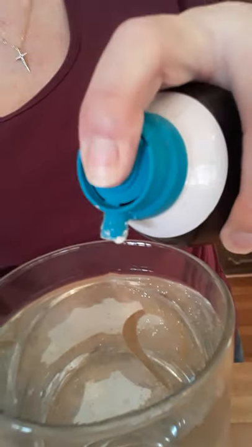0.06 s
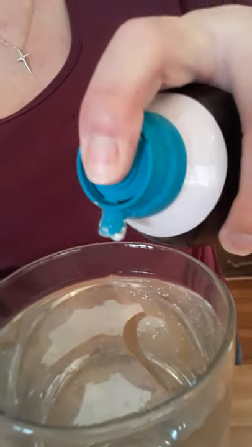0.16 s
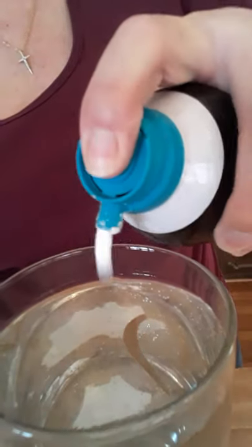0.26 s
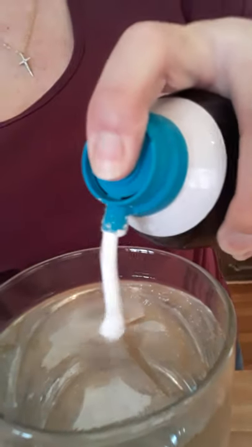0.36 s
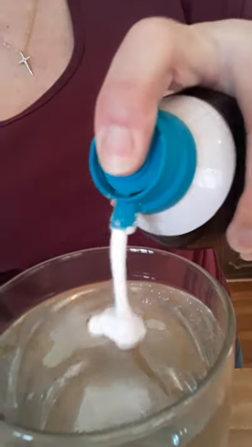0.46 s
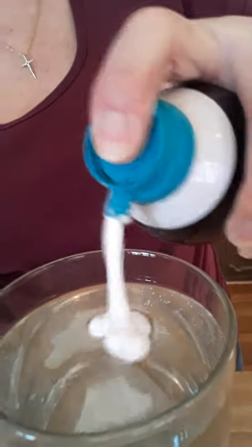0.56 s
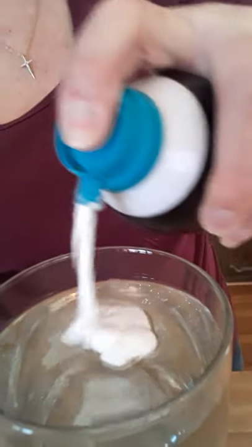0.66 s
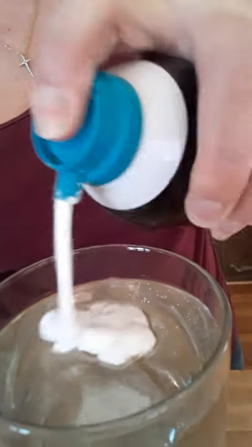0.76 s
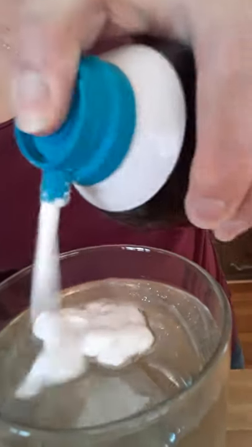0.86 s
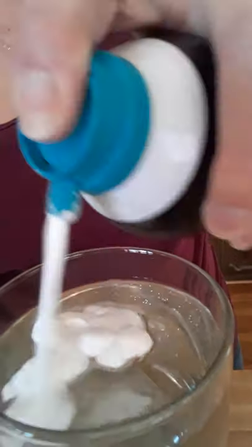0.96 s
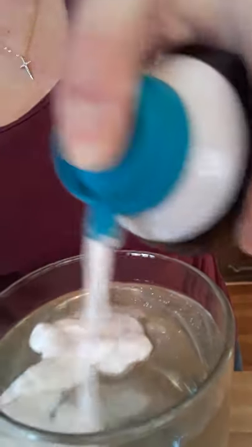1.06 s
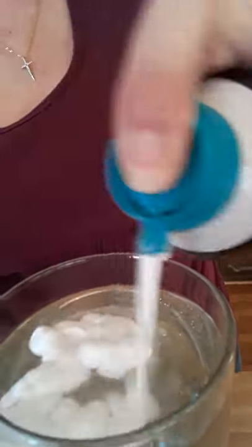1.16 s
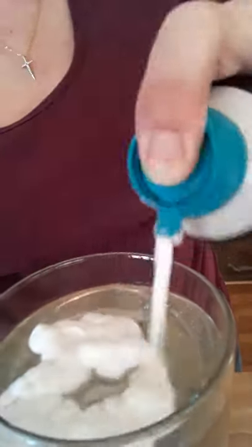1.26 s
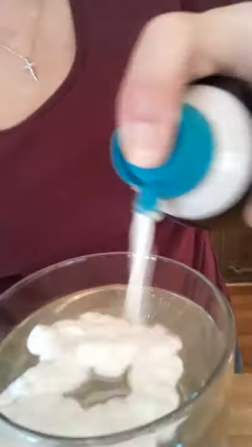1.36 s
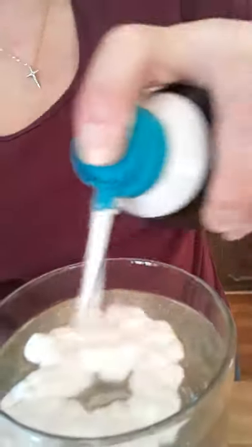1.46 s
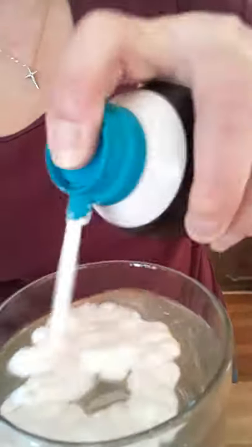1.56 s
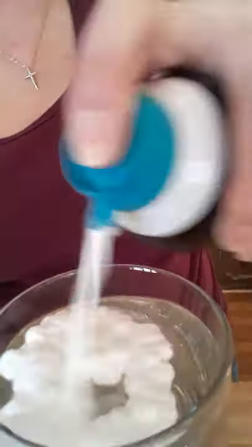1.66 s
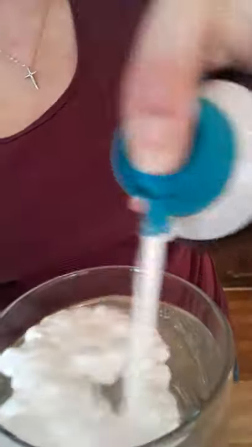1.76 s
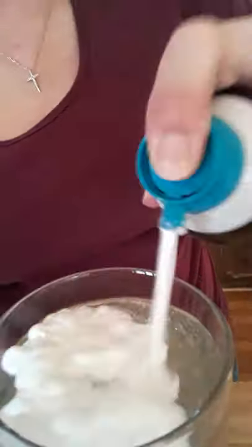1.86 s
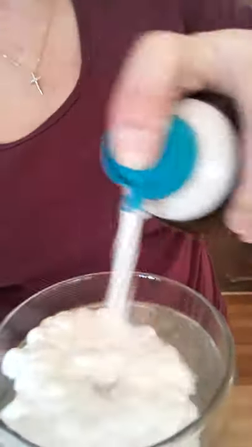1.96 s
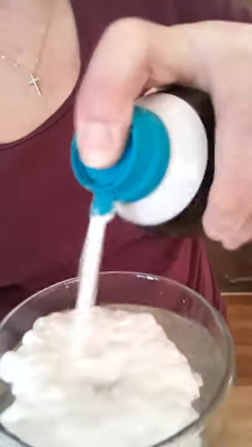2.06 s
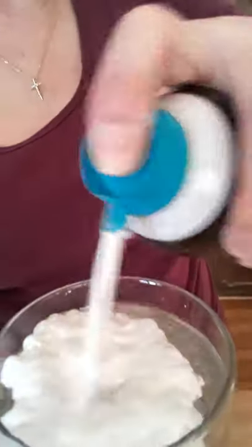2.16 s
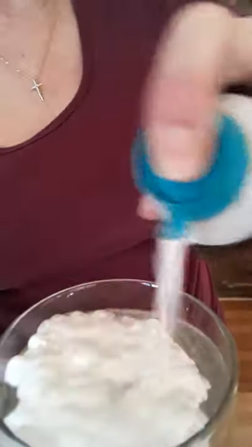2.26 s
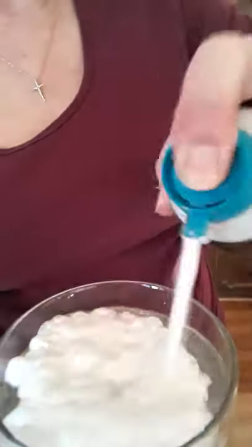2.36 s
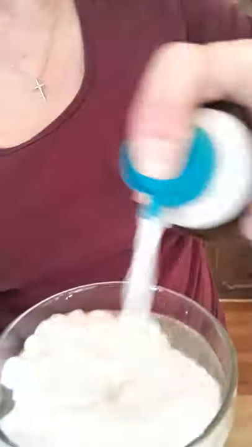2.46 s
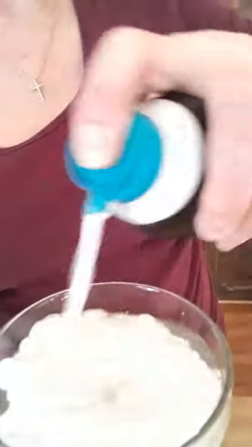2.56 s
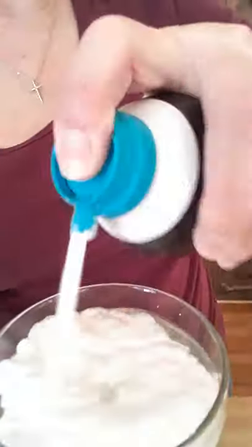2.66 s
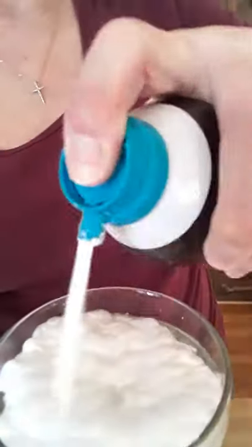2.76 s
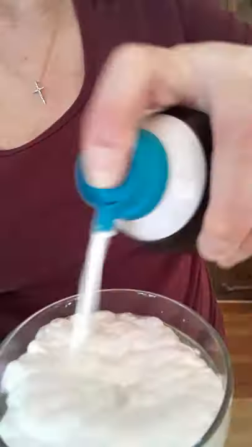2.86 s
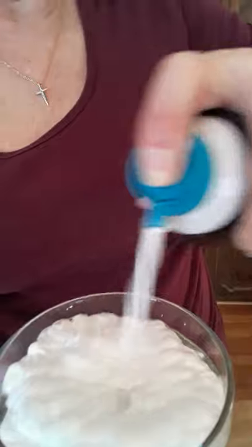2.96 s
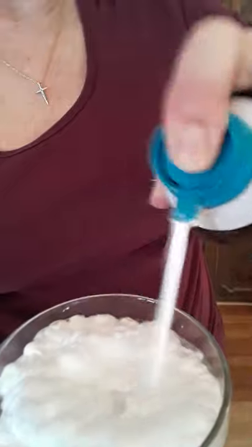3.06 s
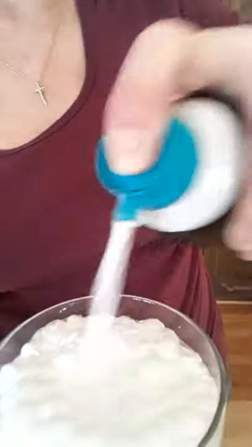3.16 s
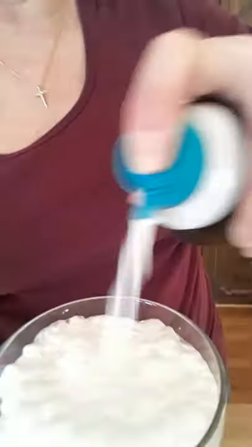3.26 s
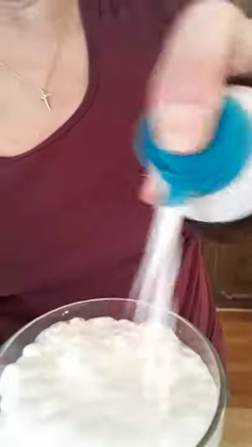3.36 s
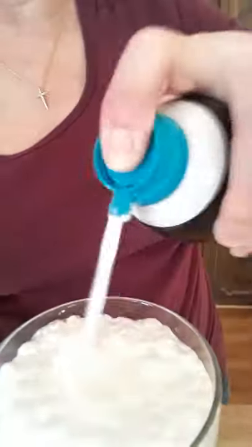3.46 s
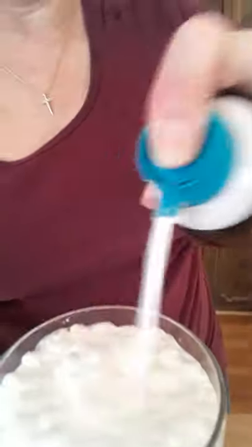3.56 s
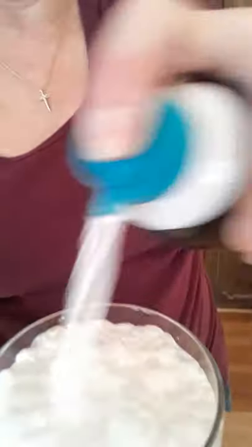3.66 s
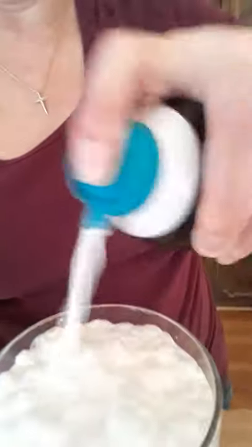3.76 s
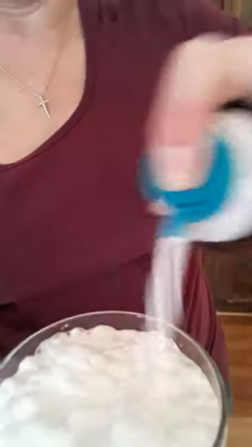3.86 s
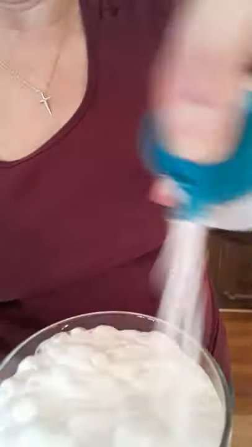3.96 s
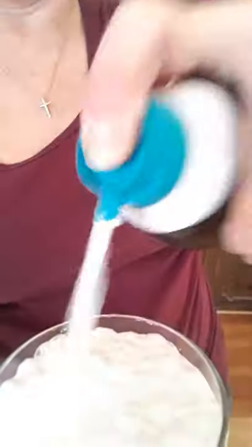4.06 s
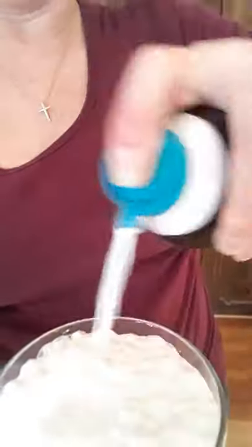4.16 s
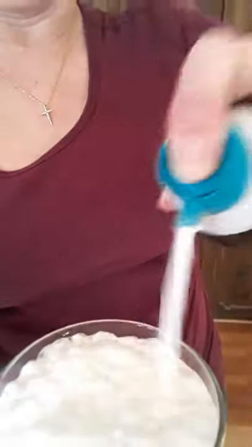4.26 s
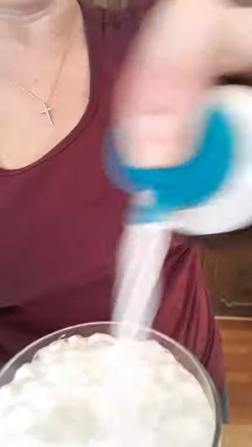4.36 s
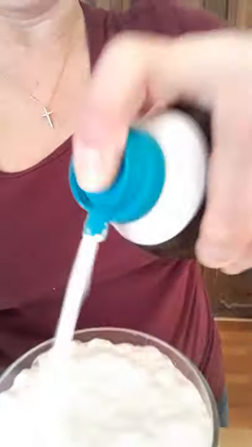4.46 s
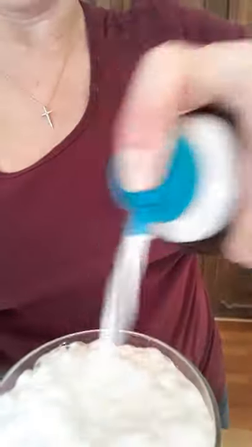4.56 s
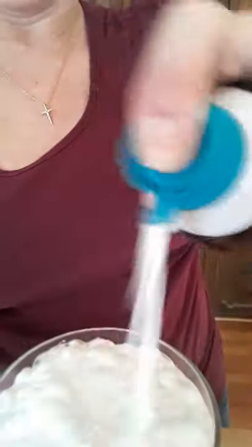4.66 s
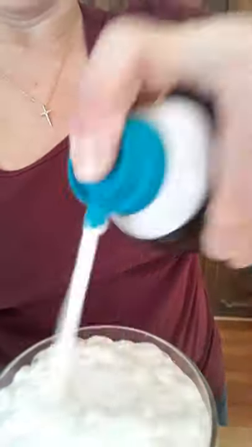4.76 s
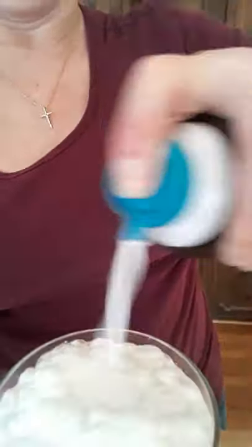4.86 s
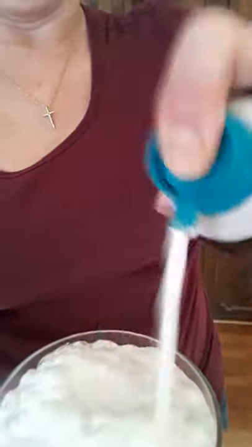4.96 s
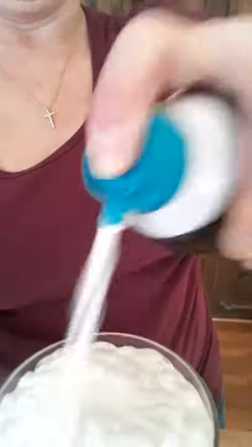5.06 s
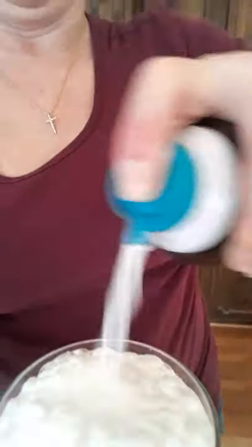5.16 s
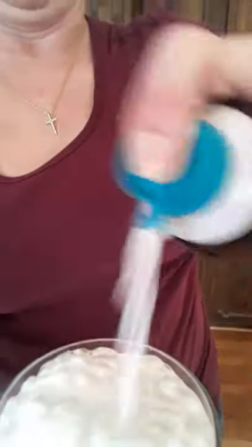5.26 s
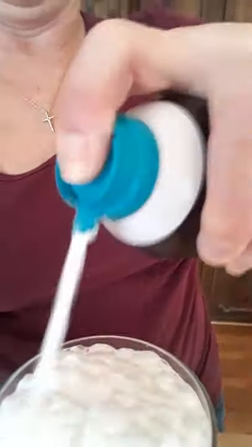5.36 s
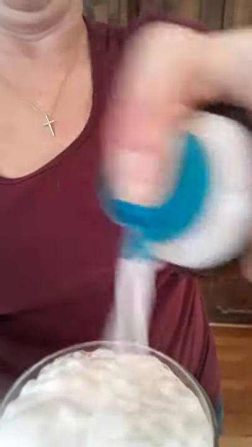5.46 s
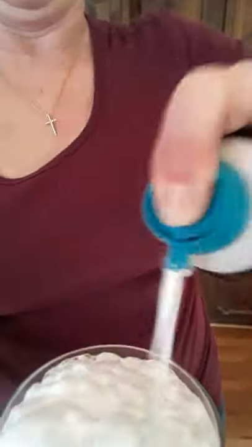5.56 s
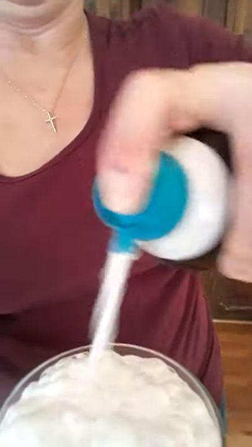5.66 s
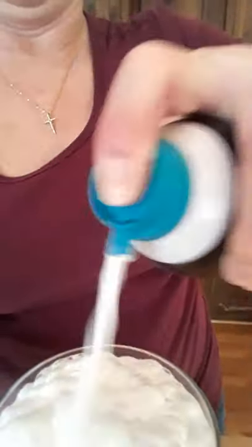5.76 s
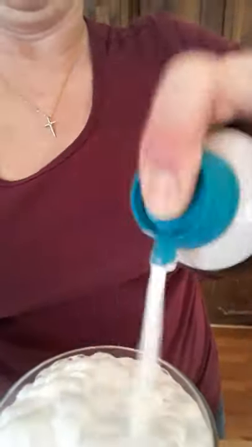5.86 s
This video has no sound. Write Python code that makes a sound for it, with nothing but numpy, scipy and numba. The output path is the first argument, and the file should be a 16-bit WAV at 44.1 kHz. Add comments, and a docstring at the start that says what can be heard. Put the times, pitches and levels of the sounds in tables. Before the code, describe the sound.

Close up in a small room, a spray can lets out a brief thin whistle of gas and a couple of sharp wet spits. A faint foamy hiss follows, swells over about two seconds into a full, gritty rush, and holds to the end. Fine crackle, fizz, small ringing pops and raspy spits ride on it, over a barely audible appliance hum. Stereo, first leaning left.

```python
"""Aerosol foam into a glass bowl

An aerosol can shoots foam into a glass bowl, close by in a small room. Gas whistles through the barely
open valve (noise in resonances), the nozzle spits plugs of foam (noise puffs), then the foam swells to
a steady, gritty rush: bursting bubbles modulate noise that drives the nozzle, the bowl and a fine fizz.
Snaps, ticks, rasps and ringing pops ride on it, a leak hisses beside it, and the circling hand shifts
the colour. Behind are an appliance hum (wavering sines), the room's air and the hand's grip (noise)."""
import sys
import numpy as np
from scipy import signal
from scipy.fft import rfft, irfft, next_fast_len
from scipy.io import wavfile
from numba import njit

SR = 44100
rng = np.random.default_rng(int(sys.argv[2]) if len(sys.argv) > 2 else 0)


def transcribe(u):
    """Save the signal u as a 16-bit wav file named by the first command-line argument.

    u: samples, shape (n,) or (channels, n), limited to [-1, 1]; the rate is SR.
    q: integer samples, one column per channel.
    """
    v = np.clip(np.atleast_2d(u).T, -1, 1)
    q = np.round(v * 32767).astype(np.int16)
    wavfile.write(sys.argv[1], SR, q)


N = 260832
TIME = np.arange(N) / SR


def from_db(db):
    """Decibels to gain."""
    return 10 ** (np.asarray(db) / 20)


def rms_one(x):
    """Scale to unit power."""
    return x / np.sqrt(np.mean(x ** 2) + 1e-20)


def in_time(rows):
    """One curve over time per column of a table, after its column of seconds."""
    s, *columns = np.transpose(rows)
    return [np.interp(TIME, s, c) for c in columns]


def at_hz(points, hz):
    """Read a table on a log-frequency axis."""
    f, value = np.transpose(points)
    return np.interp(np.log(np.maximum(hz, 1)), np.log(f), value)


def filtered(x, response):
    """Apply a frequency response, given as a function of Hz."""
    size = next_fast_len(N + SR // 10)
    hz = np.arange(size // 2 + 1) * SR / size
    return irfft(rfft(x, size) * response(hz), size)[..., :N]


def coloured(x, spectrum):
    """Give a sound a spectrum; unit power."""
    return rms_one(filtered(x, lambda hz: from_db(at_hz(spectrum, hz))))


def high_passed(x, hz):
    """Steep cut below a frequency: small sources radiate no bass."""
    sos = signal.butter(2, hz, "high", fs=SR, output="sos")
    return signal.sosfilt(np.vstack([sos, sos, sos]), x)


@njit
def moving_resonance(x, hz, width, rate):
    """A two-pole band-pass whose centre follows a curve."""
    out, r = np.zeros_like(x), np.exp(-np.pi * width / rate)
    pull = 2 * r * np.cos(2 * np.pi * hz / rate)
    for c in range(2):
        for i in range(2, x.shape[1]):
            driven = (1 - r * r) / 2 * (x[c, i] - x[c, i - 2])
            out[c, i] = driven + pull[i] * out[c, i - 1] - r * r * out[c, i - 2]
    return out


def lifted(x, hz, width_hz, gain_db):
    """Raise or dent a band whose centre may move."""
    return x + (from_db(gain_db) - 1) * moving_resonance(x, hz, width_hz, SR)


def moving_filter(x, response):
    """Apply a response that changes slowly, given as a function of Hz and the moment (sample)."""
    hz, s, frames = signal.stft(x, SR, nperseg=1024, noverlap=768)
    now = np.minimum((s * SR).astype(int), N - 1)
    return signal.istft(frames * response(hz[:, None], now), SR, nperseg=1024, noverlap=768)[1][:, :N]


def bell(hz, centre_hz, width_hz):
    """1 at the centre of a band, a half at its edges."""
    return 1 / (1 + (2 * (hz - centre_hz) / width_hz) ** 2)


def drift(rate):
    """Slow chance with spread 1, faster for a higher rate."""
    r = np.exp(-40 * np.pi * rate / SR)  # one step is 20 samples
    steps = rng.standard_normal(N // 20 + 2002)
    slow = signal.lfilter([1], [1, -2 * r, r * r], steps)[2000:]
    return np.interp(np.arange(N) / 20, np.arange(len(slow)), rms_one(slow))


# How alike the two ears hear a source. Each row: frequency in Hz, likeness (1 = identical).
LIKENESS = [(100, 1), (450, 0.5), (700, 0.98), (1400, 0.97), (2600, 0.985), (4200, 0.85), (6000, 0.5),
            (8000, 0.35), (16000, 0.5)]


def ears(pair):
    """Two unrelated sounds become one source at two ears, their likeness set for each frequency."""
    length = pair.shape[1]
    size = next_fast_len(length + 500)
    alike = np.clip(at_hz(LIKENESS, np.arange(size // 2 + 1) * SR / size), 0, 1)
    mid, side = rfft(pair, size) * np.sqrt([1 + alike, 1 - alike])
    return rms_one(irfft(np.array([mid + side, mid - side]), size)[:, :length])


def turbulence():
    """Turbulent flow: white noise at two ears."""
    return ears(rng.standard_normal((2, N)))


def panned(x, pan_db):
    """Tilt the level towards the left."""
    return x * from_db(np.array([[.5], [-.5]]) * pan_db)


def bursts(per_s, spread_db, decay_s, smooth_share):
    """Envelope of bubbles bursting at random, each a short puff of its own size, over a smooth flow."""
    sizes = from_db(spread_db * np.clip(rng.standard_normal(N), -2, 2))
    hits = sizes ** 2 * (rng.random(N) < per_s / SR) + 1e-18
    power = signal.lfilter([1], [1, -np.exp(-2 / (decay_s * SR))], hits)
    share = np.clip(smooth_share, 0, 1)
    return np.sqrt(share + (1 - share) * power / power.mean())


# Appliance hum. Each row: frequency in Hz, level in dB before it wavers.
HUM = [(156.5, -62.5), (237.5, -67.5), (269, -72)]


def hum():
    """Steady machine tones, each with a level and phase that waver slightly."""
    out = 0
    for hz, db in HUM:
        level = from_db(db + 1.8 * drift(9)) * np.sqrt(2)
        out = out + level * np.sin(2 * np.pi * hz * TIME + .6 * drift(7))
    return out


# The room's air. Each row: frequency in Hz, relative level in dB per Hz.
ROOM_AIR = [(20, -15), (60, -18), (170, -7), (600, -2), (1200, -5.5), (8000, -26)]


def room_air():
    """Still air: faint noise, mostly low."""
    return from_db(-55.0) * coloured(turbulence(), ROOM_AIR)


# The hand grips the can, then circles it. Each row: time in seconds, level in dB.
GRIP = [(0, -76), (.03, -51), (.05, -46.5), (.075, -53), (.11, -51), (.145, -49), (.22, -66), (.6, -86),
        (1.1, -90), (1.7, -66), (2.7, -83)]
# Colour of the grip. Each row: frequency in Hz, relative level in dB per Hz.
GRIP_COLOUR = [(30, -27), (90, 12), (300, 9), (600, -1), (1500, -32), (4000, -44)]


def grip():
    """Skin on the can: dull noise."""
    return from_db(in_time(GRIP)[0]) * coloured(turbulence(), GRIP_COLOUR)


# Level curve shared by hum and air. Each row: time in seconds, gain in dB.
HUM_LEVEL = [(0, -2), (.07, 3), (1.2, 2.5), (1.7, 6.5), (2.2, 4.5), (2.6, -1)]


def background():
    """A wavering appliance hum and the room's air under one shared level curve; the hand adds to them."""
    return (hum() + room_air()) * from_db(in_time(HUM_LEVEL)[0]) + grip()


# Gas before the foam. Each row: time in seconds, level in dB before a 2 dB lift.
GAS = [(0, -45), (.024, -40), (.054, -33), (.17, -32), (.185, -27.5), (.203, -58), (.26, -66)]
# The empty nozzle's whistling resonances. Each row: centre in Hz, half-width in Hz, level in dB.
GAS_MODES = [(2290, 360, -28), (4920, 370, -10), (7400, 560, -6), (11400, 470, -11), (13200, 1600, -18),
             (14950, 640, 2)]


def gas():
    """Propellant alone squeezes past the valve and sounds the empty nozzle."""
    jet = turbulence() * bursts(per_s=5100, spread_db=15, decay_s=0.0013, smooth_share=0.94)

    def empty_nozzle(hz):
        gain = from_db(-29.5)
        for f, width, db in GAS_MODES:
            gain = gain + from_db(db) / (1 + ((hz - f) / width) ** 2) ** 2
        return gain
    whistle = rms_one(high_passed(filtered(jet, empty_nozzle), 270))
    fade_out = np.interp(TIME, [.2, .26], [1, 0])
    return panned(whistle * from_db(in_time(GAS)[0] + 2.0) * fade_out, pan_db=16.5)


# The first plugs of foam leave the nozzle.
# Each row: start in seconds, level in dB, decay in seconds, level of the bright part in dB.
PLUGS = [(0.179, -18.5, .004, -10), (0.183, -15, .004, 0), (0.190, -24.5, .004, -2),
         (0.206, -30, .0015, -10), (0.218, -16.5, .0017, -20), (0.255, -40, .005, -18)]
# Colour of a plug. Each row: frequency in Hz, relative level in dB per Hz.
PLUG_COLOUR = [(350, -68), (600, -21), (1390, -20), (1980, 5), (3000, -11), (3680, -13), (4910, 12),
               (5790, -8), (10000, -7.5), (14500, 3)]


def plugs():
    """Plugs of foam pop out in quick, dying puffs, the last ones dullest."""
    puff = coloured(turbulence(), PLUG_COLOUR)
    dull = signal.sosfilt(signal.butter(2, 5500, fs=SR, output="sos"), puff)
    bright = signal.sosfilt(signal.butter(2, 7000, "high", fs=SR, output="sos"), puff)
    out = 0
    for s, level_db, decay_s, bright_db in PLUGS:
        envelope = (TIME >= s) * np.exp(-np.abs(TIME - s) / decay_s)
        out = out + from_db(level_db) * envelope * (dull - from_db(bright_db) * bright)
    return panned(high_passed(out, 580), pan_db=11.5)


# foam covers the bottom of the bowl around this moment, over this long
COVERED_AT_S, COVERING_S = 2.6, 0.56


def as_bowl_fills(bare, covered):
    """Glide from one value to another as foam covers the bowl."""
    return bare + (covered - bare) * (1 + np.tanh((TIME - COVERED_AT_S) / COVERING_S)) / 2


# The hand circles, by and by faster and tighter; the jet passes the thin, bright side and the full,
# dark side in turn. Each row: time in seconds, upper edge of the hollow in Hz.
TURNS = [(.45, 2900), (1.03, 2450), (1.45, 3200), (1.74, 2650), (1.98, 3200), (2.25, 2550), (2.47, 3150),
         (2.74, 2600), (3.03, 3100), (3.22, 2600), (3.5, 2900), (3.68, 2620), (3.87, 3000), (4.07, 2650),
         (4.25, 2950), (4.41, 2700), (4.58, 2900), (4.75, 2700), (4.92, 2880), (5.08, 2680), (5.25, 2800),
         (5.42, 2650), (5.62, 2950), (5.88, 2650)]


def circling():
    """The hand's place in its turn: 1 on the thin, bright side, -1 on the full, dark side."""
    return np.cos(np.pi * np.interp(TIME, np.transpose(TURNS)[0], np.arange(len(TURNS))))


def hollow_edge():
    """The hollow's upper edge in Hz: it glides between the two sides of each turn."""
    thin, full = in_time(TURNS[::2])[0], in_time(TURNS[1::2])[0]
    return full + (thin - full) * (1 + circling()) / 2


# share by which a turn swings the resonances either way, over the bare bowl and over foam
BARE_SWING, COVERED_SWING = 0.125, 0.032


def swing():
    """Relative shift of the resonances with the circling hand, smaller once the bowl is covered."""
    return circling() * as_bowl_fills(BARE_SWING, COVERED_SWING)


SINKS_FROM_S, SINK_PER_S = 2.62, 0.023  # start, share a second


def sinking():
    """Factor by which the can's resonances fall as it runs low."""
    return np.exp(-SINK_PER_S * np.maximum(TIME - SINKS_FROM_S, 0))


# Air in the bowl and around the can. Each row: frequency in Hz, relative level in dB per Hz.
BOWL = [(130, -45), (240, -19.5), (480, -25.5), (650, -10.5), (900, -8.5), (1200, -3.5), (1420, -7.5),
        (1650, -4.5), (2100, -4), (2600, -4), (3200, -16), (5000, -44)]
# The can's low resonance at each ear (left, then right).
# Each row: lift in dB over the bare bowl, lift in dB over foam.
LOW_LIFT = [(5.5, 8.5), (3, 6)]
# its centre before it sinks, its width, and the swing of its lift in a turn (up on the thin side)
LOW_HZ, LOW_WIDTH_HZ, LOW_TURN_DB = 1851, 307, 1.4


def bowl(grit, surge):
    """Bursting bubbles ring the air in the bowl and the can's low resonance; unit power."""
    rush = coloured(turbulence() * grit ** 1.04 * from_db(1.2 * surge), BOWL)
    lift_db = np.array([as_bowl_fills(*ear) for ear in LOW_LIFT]) + LOW_TURN_DB * circling()
    return rms_one(lifted(rush, LOW_HZ * sinking(), LOW_WIDTH_HZ, lift_db))


def bubbles(per_s, pitch, spread_db, scatter, cycles, count):
    """Single bubbles snap at the mouth of the nozzle, each a few cycles at a pitch of its own."""
    when, chance = rng.random((count, 2)).T
    size, tone, lean = np.clip(rng.standard_normal((count, 3)).T, -2.2, 2.2)
    at = (when * (N - 1)).astype(int)
    born = chance < per_s[at] * N / SR / count
    at, size, tone, lean = at[born], size[born], tone[born], lean[born]
    own_pitch = pitch[at] * np.exp(scatter * (tone + .15 * tone ** 2))
    turns = np.outer(own_pitch, np.arange(128) / SR)
    snaps = turns * np.exp(-turns / cycles) * np.sin(2 * np.pi * turns)
    # sparse bubbles carry the same power as dense ones
    snaps *= (from_db(spread_db * size) / np.sqrt(per_s[at]))[:, None]
    where = (at[:, None] + np.arange(snaps.shape[1])).ravel()
    signs = 1, np.sign(lean)[:, None]  # a random sign makes the second channel unrelated
    return ears(np.array([np.bincount(where, (snaps * sign).ravel(), N)[:N] for sign in signs]))


# The nozzle's peaks. Each row: multiple of the main resonance, width in Hz, level in dB.
NOZZLE_MODES = [(0.767, 890, 2.5), (0.952, 1000, -4), (1.15, 960, 1), (1.42, 2320, -2.5)]
# the main resonance over the bare bowl and over foam, before swing, flow and flutter shift it
BARE_HZ, COVERED_HZ = 4550, 3880
# a weak jet sounds higher: the flow that counts as full, pitch share per dB
FULL_FLOW_DB, PITCH_PER_DB = -20.5, -0.0073


def nozzle(grit, flow_db):
    """A rush in the nozzle's resonances, and snapping bubbles that crowd together as the flow grows."""
    bend = swing() + PITCH_PER_DB * (flow_db - FULL_FLOW_DB)
    pitch = as_bowl_fills(BARE_HZ, COVERED_HZ) * np.exp(bend)
    flutter = pitch * np.exp(0.09 * np.tanh(drift(32.0)))
    rush = 0
    for multiple, width, level_db in NOZZLE_MODES:
        uneven = turbulence() * grit * from_db(8.0 * np.tanh(0.5 * drift(45)))
        once = moving_resonance(uneven, flutter * multiple, width, SR)
        twice = moving_resonance(once, flutter * multiple, width, SR)
        rush = rush + from_db(level_db) * rms_one(twice)
    per_s = 1000 * from_db(0.85 * (flow_db + 23.5))
    snaps = bubbles(per_s, pitch * .97, spread_db=4.5, scatter=0.15, cycles=2.15, count=12000)
    return rms_one(rms_one(rush) + from_db(-0.5) * rms_one(high_passed(snaps, 2880)))


# Colour of the fizz. Each row: frequency in Hz, relative level in dB per Hz.
FIZZ = [(3000, -53), (6000, 2), (7500, 7.5), (8600, -13), (9800, -2.5), (12000, -6.5), (16000, -35)]


def fizz(grit, flow_db):
    """Fine foam fizzes: gritty noise and tiny high bubbles under an uneven level."""
    per_s = 1000 * from_db(0.94 * (flow_db + 25.5))
    tiny = bubbles(per_s, np.full(N, 7300.), spread_db=7, scatter=0.2, cycles=5.0, count=9000)
    both = coloured(turbulence() * grit, FIZZ) + from_db(-1.5) * rms_one(high_passed(tiny, 2500))
    return both * from_db(flow_db - 18.0 + 5.7 * np.tanh(0.9 * drift(57)))


# Colour of the ticks. Each row: frequency in Hz, relative level in dB per Hz.
TICK_COLOUR = [(100, -75), (1000, -14), (2600, 10.5), (3600, -0.5), (5500, 0), (7500, -13.5), (8700, -35),
               (16000, -14)]
# rate at full flow, swing of that rate in clumps, level against the flow, decay
TICKS_PER_S, CLUMP_DB, TICK_DB, TICK_DECAY_S = 330, 7.5, -8.5, 0.00022


def crackle(flow_db):
    """Thin foam films tear in clumps of tiny, broad ticks."""
    crowding_db = 0.5 * (flow_db - FULL_FLOW_DB)
    per_s = TICKS_PER_S * from_db(crowding_db + CLUMP_DB * np.tanh(0.7 * drift(35)))
    sizes = from_db(5.4 * np.clip(rng.standard_normal(N), -2, 2))
    ticks = (rng.random(N) < per_s / SR) * sizes / np.sqrt(from_db(crowding_db))
    r = np.exp(-1 / (TICK_DECAY_S * SR))
    envelope = signal.lfilter([1], [1, -2 * r, r * r], ticks + 1e-18)
    return coloured(turbulence() * envelope, TICK_COLOUR) * from_db(flow_db + TICK_DB)


# Gas that keeps hissing through the valve. Each row: time in seconds, level in dB before a 5 dB lift.
LEAK = [(.3, -52), (.8, -50), (1.5, -46.5), (1.8, -42), (2.05, -43), (2.3, -40), (2.6, -44.5), (5.9, -47)]
# Colour of the leak. Each row: frequency in Hz, relative level in dB per Hz.
LEAK_COLOUR = [(7000, -34), (10000, -21), (11800, -8), (12900, -11), (13500, -6.5), (14500, -7),
               (15500, -0.5)]
# The leak's airy whistle. Each row: time in seconds, pitch in Hz.
LEAK_WHISTLE = [(.35, 14000), (.9, 13700), (1.72, 13600), (1.98, 14300), (2.23, 13600), (2.45, 14500),
                (2.8, 13800)]


def leak(grit):
    """Gas hisses past the foam, with one airy whistle that bends."""
    hiss = coloured(turbulence() * grit ** 0.19 * from_db(2.0 * drift(30)), LEAK_COLOUR)
    whistling = lifted(hiss, in_time(LEAK_WHISTLE)[0], width_hz=480, gain_db=8.5)
    return rms_one(whistling) * from_db(in_time(LEAK)[0] + 5.0)


# The biggest single bubbles pop at the nozzle.
# Each row: start in seconds, level in dB before POP_DB, pitch in Hz before its wobble.
POPS = [(0.219, -28.5, 4467), (0.885, -29, 3990), (1.019, -32, 3700), (1.26, -26, 3520), (1.313, -21, 4520),
        (1.491, -14.5, 4910), (2.172, -19, 4100), (2.773, -13.5, 4000), (4.119, -15.5, 4000),
        (4.417, -16.5, 3980), (4.564, -13, 4820), (5.176, -16, 4640), (5.377, -14.5, 3760),
        (5.528, -19, 4060), (5.813, -16, 4000)]
# every pop: rise, decay, pitch wobble (share), gain
POP_RISE_S, POP_DECAY_S, POP_WOBBLE, POP_DB = 0.0007, 0.0025, 0.074, 4.5


def pops():
    """A big bubble bursts and rings the nozzle for a few unsteady milliseconds."""
    envelope = 0
    for s, level_db, _ in POPS:
        rise = np.clip((TIME - s) / POP_RISE_S, 0, 1)
        envelope = envelope + from_db(level_db) * rise * np.exp(-np.abs(TIME - s) / POP_DECAY_S)
    pitch = in_time(POPS)[1] * np.exp(POP_WOBBLE * drift(297))
    return from_db(POP_DB) * envelope * np.sin(2 * np.pi * np.cumsum(pitch) / SR)


# The largest pockets of gas break through the foam.
# Each row: peak in seconds, level in dB before an 11 dB lift.
SPITS = [(.657, -49), (1.019, -49), (1.215, -46), (1.641, -31), (1.709, -32), (1.847, -31), (2.056, -32),
         (2.322, -32.5), (2.86, -30.5), (2.987, -34), (3.24, -38), (3.67, -34), (4.648, -34), (5.293, -32),
         (5.63, -34)]
# every large pocket's rasp: pitch, its wander (share), rise and fall
SPIT_HZ, SPIT_WANDER, SPIT_RISE_S, SPIT_FALL_S = 6300, 0.13, 0.0086, 0.0051
# small pockets: rate, level against the full flow, scatter of that level, length against a large one
POCKETS_PER_S, POCKET_DB, POCKET_SPREAD_DB, POCKET_LENGTH = 45, -14, -5, 0.35
POCKETS_FOLLOW = 0.9  # share of the flow's swing in dB that their level follows


def spits(flow_db):
    """A gas pocket thins the foam for some milliseconds: a higher rasp. Small ones scale with the flow."""
    when, chance, size = rng.random((400, 3)).T
    born = chance < POCKETS_PER_S * N / SR / len(when)
    at = (when[born] * (N - 1)).astype(int)
    small_db = FULL_FLOW_DB + POCKETS_FOLLOW * (flow_db[at] - FULL_FLOW_DB)
    small_db = small_db + POCKET_DB + POCKET_SPREAD_DB * (2 * size[born] - 1)
    envelope = np.zeros(N)
    for pockets, length in (SPITS, 1), (zip(TIME[at], small_db), POCKET_LENGTH):
        for s, level_db in pockets:
            near = slice(max(int((s - .04) * SR), 0), int((s + .04) * SR))
            age = (TIME[near] - s) / length
            slope_s = np.where(age < 0, SPIT_RISE_S, SPIT_FALL_S)
            envelope[near] += from_db(level_db) * np.exp(-np.abs(age) / slope_s)
    pitch = SPIT_HZ * np.exp(SPIT_WANDER * np.tanh(drift(38.0)))
    once = moving_resonance(turbulence(), pitch, 1220.0, SR)
    rasp = moving_resonance(once, pitch, 1220.0, SR)
    return from_db(11.0) * envelope * rms_one(rasp)


# Fixed resonances between bowl, table and body.
# Each row: centre in Hz, width in Hz, gain in dB at the left ear, gain in dB at the right ear.
SURROUNDINGS = [(660, 250, 2, -1.5), (1360, 280, 3, 6), (1570, 150, -1, -5), (6750, 1000, -3, -5.5)]


def surroundings(x):
    """Nearby surfaces lift and dent a few bands, differently at each ear."""
    def response(hz):
        gain_db = 0
        for f, width, left, right in SURROUNDINGS:
            gain_db = gain_db + np.array([[left], [right]]) * bell(hz, f, width)
        return from_db(gain_db)
    return filtered(x, response)


# Resonances and a gap between them that stand out as the can empties.
# Each row: centre in Hz before it sinks, width in Hz, gain in dB at full prominence.
CAN_MODES = [(4250, 206, 7), (4820, 380, -0.5), (5140, 160, 7.5)]


def can_body(x):
    """The can's resonances colour the jet, faintly over the bare bowl and strongly over foam."""
    prominence, sunk = as_bowl_fills(0.29, 0.93), sinking()  # share of the gain in dB
    for hz, width_hz, gain_db in CAN_MODES:
        x = lifted(x, hz * sunk, width_hz, gain_db * prominence)
    return x


# the cancelled band: width, mean depth, swing of the depth in a turn (deeper on the thin side)
HOLLOW_WIDTH_HZ, HOLLOW_DB, HOLLOW_TURN_DB = 720, -8, -1.8
# how far its centre lies below its upper edge, over the bare bowl and over foam
BARE_BELOW_HZ, COVERED_BELOW_HZ = 360, 110
# the top of the fizz is duller until foam covers the bowl: centre, width, depth
DULL_HZ, DULL_WIDTH_HZ, DULL_DB = 9900, 2400, -4.5


def foam_echo(x):
    """The echo off the foam cancels one band, a moving hollow; the top is dull until foam covers the bowl."""
    centre = hollow_edge() - as_bowl_fills(BARE_BELOW_HZ, COVERED_BELOW_HZ)
    depth_db = HOLLOW_DB + HOLLOW_TURN_DB * circling()
    dull_db = as_bowl_fills(DULL_DB, 0)

    def response(hz, now):
        hollow = depth_db[now] * bell(hz, centre[now], HOLLOW_WIDTH_HZ)
        return from_db(hollow + dull_db[now] * bell(hz, DULL_HZ, DULL_WIDTH_HZ))
    return moving_filter(x, response)


# The foam arrives, swells as the valve is pressed further, then holds.
# Each row: time in seconds, rush in the bowl in dB, nozzle in dB, both before the trims in foam().
FLOW = [(.12, -63.5, -74), (.25, -53, -69), (.35, -60.5, -53.5), (.39, -50.5, -48), (.58, -47.5, -45.5),
        (.82, -46, -44.5), (.9, -43, -42), (1.28, -40, -39), (1.52, -34.5, -30), (1.85, -31.5, -26.5),
        (2.3, -31.5, -26), (2.58, -33.5, -27.5), (2.8, -32.5, -26.5)]
# Where the jet sits between the ears. Each row: time in seconds, left minus right in dB.
PAN = [(.3, 8), (.7, 7), (1.5, 7), (2.1, 5), (2.65, 0.8), (5.9, 1.4)]
TURN_DIP_DB = 1  # the nozzle dips by this on the thin side of a turn and rises by it on the full side


def foam():
    """The jet: dense bursts and uneven flow drive the nozzle, the bowl and a fine fizz together."""
    bowl_db, flow_db = in_time(FLOW)
    nozzle_db = flow_db + 2.5 - TURN_DIP_DB * circling()
    surge = np.tanh(0.58 * drift(15.6))
    grit = bursts(per_s=1100, spread_db=3.5, decay_s=0.00047, smooth_share=0.51)
    rush = bowl(grit, surge) * from_db(bowl_db + 4.5)
    ring = rms_one(nozzle(grit, nozzle_db) * from_db(2.2 * surge)) * from_db(nozzle_db - 1.31)
    jet = rush + ring + fizz(grit, nozzle_db) + crackle(nozzle_db) + leak(grit)
    jet = jet + pops() + spits(nozzle_db)
    return panned(foam_echo(can_body(surroundings(jet))), in_time(PAN)[0])


def room(x, t60, wet_db):
    """A short diffuse tail, fed from the left channel and spread over both ears."""
    age = np.arange(SR // 2) / SR
    tail = ears(rng.standard_normal((2, len(age)))) * 1000 ** (-age / t60) * (age > .004)
    tail /= np.sqrt(np.sum(tail ** 2, axis=1, keepdims=True))
    return x + from_db(wet_db) * signal.fftconvolve(x[:1], tail, axes=1)[:, :N]


# How far the left ear leads, bent by nearby echoes.
# Each row: frequency in Hz before sinking and sway shift it, lead in radians.
LEAD = [(550, 0), (1100, 1.2), (1560, 2.9), (1660, 7.7), (2000, 8.3), (2200, 9.3), (2900, 9.35),
        (3500, 10.3), (4100, 10.3), (4500, 12.4), (4700, 15.9), (5200, 17.6), (6650, 19.8), (16000, 34)]
LEAD_FOLLOWS = 0.74  # share of the hand's swing that the treble's lag follows
EDGE_STEP, EDGE_WIDTH_HZ = 2.1, 130  # extra lag above the hollow's edge in radians, half-width of the step


def right_ear_late(x):
    """The right ear lags, a step later above the hollow's edge; the treble's lag sways with the hand."""
    edge, sunk, sway = hollow_edge(), sinking(), LEAD_FOLLOWS * swing()

    def response(hz, now):
        shift = sunk[now] * np.exp(sway[now] * np.interp(hz, [3800, 4700], [0, 1]))
        step = EDGE_STEP * (1 + np.tanh((hz - edge[now]) / EDGE_WIDTH_HZ)) / 2
        lead = np.interp(hz / shift, *np.transpose(LEAD)) + step
        return np.array([np.ones_like(lead), np.exp(-1j * lead)])
    return moving_filter(x, response)


def scene():
    """The can in the room, with the background behind."""
    can = room(gas() + plugs() + foam(), t60=0.22, wet_db=-13.0)
    return right_ear_late(can + background())


CUTOFF_HZ = 15850


def record(dry):
    """The top is cut steeply."""
    return filtered(dry, lambda hz: 1 / np.sqrt(1 + (hz / CUTOFF_HZ) ** 400))


dry = scene()
out = record(dry)
transcribe(out)
```